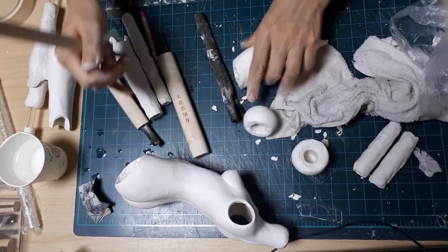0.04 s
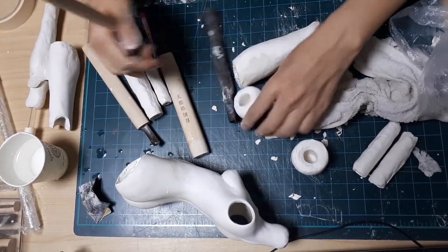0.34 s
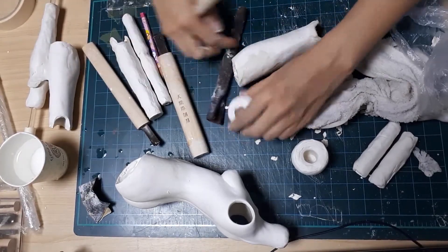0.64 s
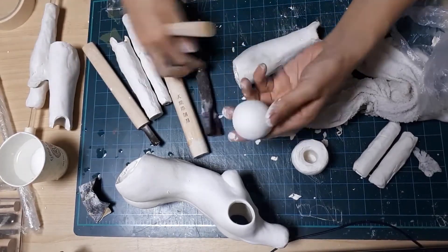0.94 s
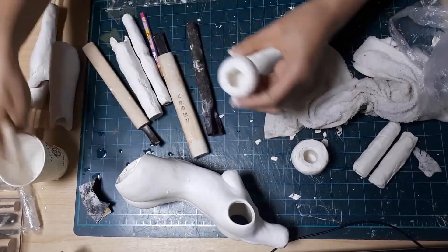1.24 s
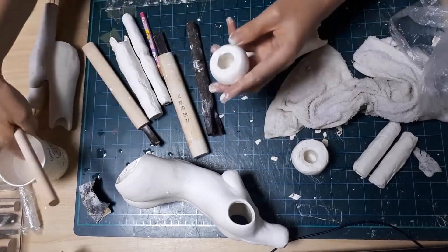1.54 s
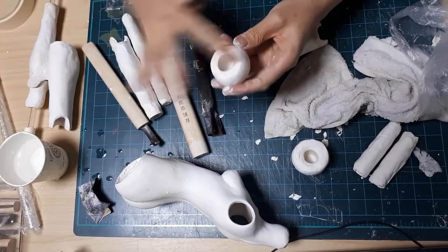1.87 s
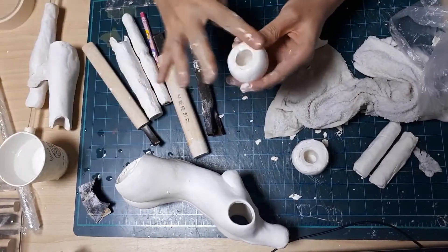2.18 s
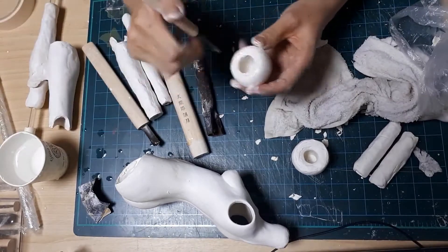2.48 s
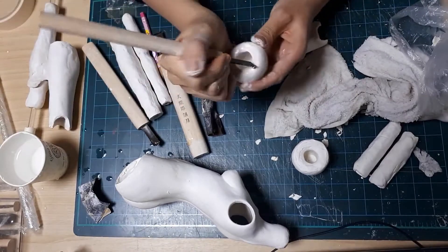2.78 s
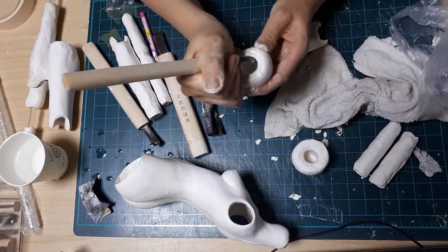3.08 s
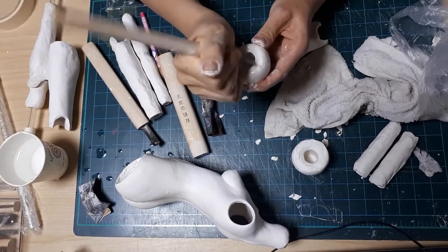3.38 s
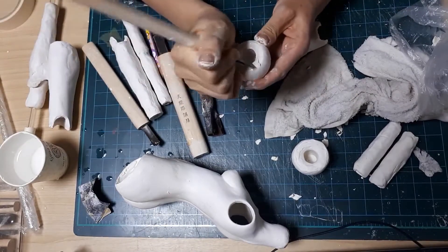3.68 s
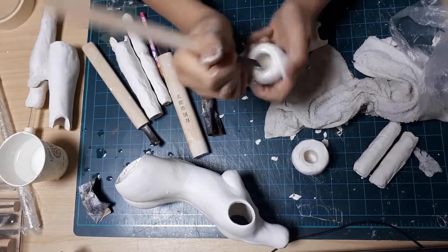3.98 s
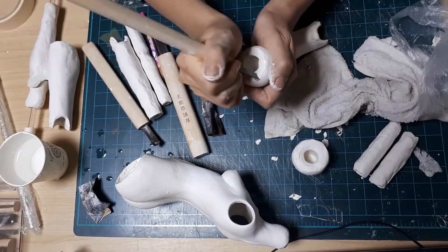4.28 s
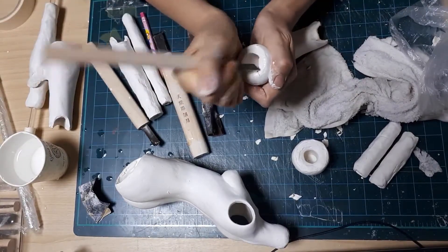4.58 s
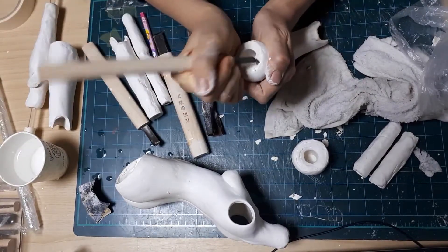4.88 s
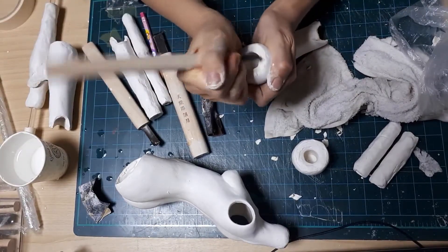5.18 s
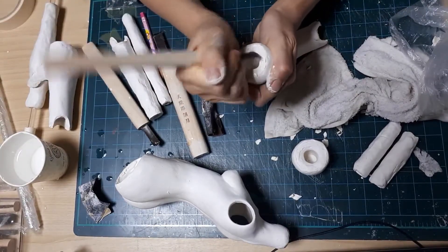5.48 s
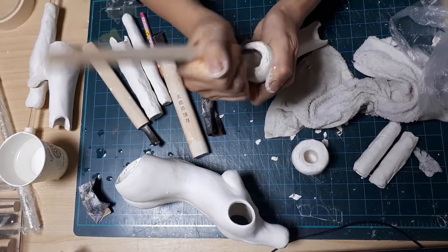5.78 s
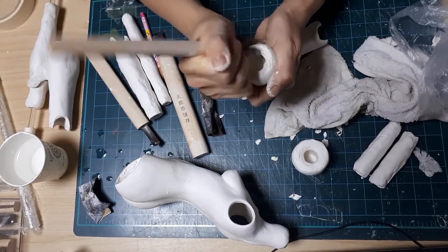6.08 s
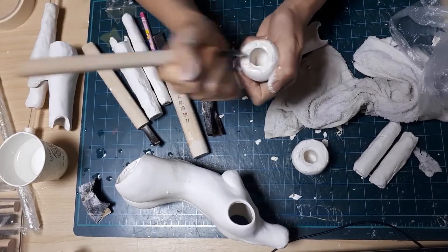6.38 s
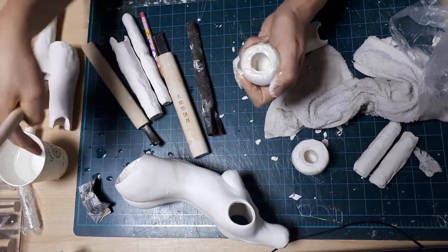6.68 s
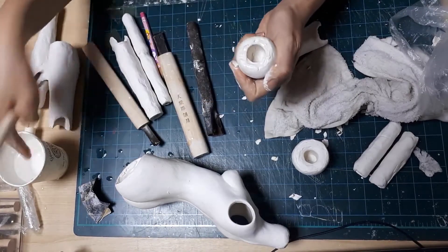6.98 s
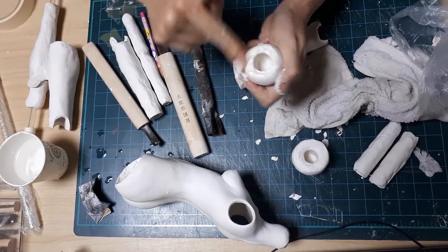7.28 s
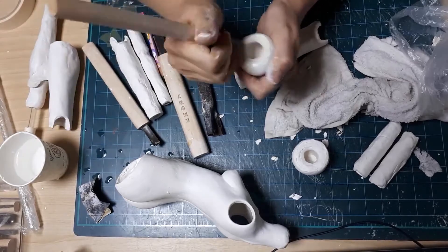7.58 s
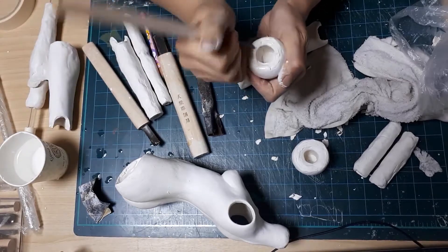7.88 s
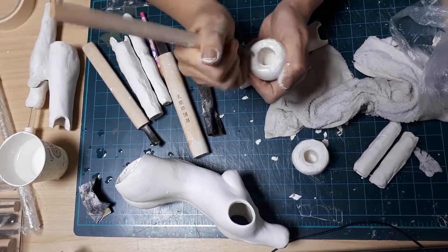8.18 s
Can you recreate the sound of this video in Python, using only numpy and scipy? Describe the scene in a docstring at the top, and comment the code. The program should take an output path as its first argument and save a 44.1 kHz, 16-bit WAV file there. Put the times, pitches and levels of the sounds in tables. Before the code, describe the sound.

Close up at a desk in a small room, a few hollow knocks stand out among light taps, slides and the brief stuttering drag of a clay piece on a mat. After a short lull, a knife scrapes inside the hollow piece in a much quieter series of dry, slightly ringing strokes, squeaking briefly as it catches. The strokes thin out toward the end, over a low, steady fan hum.

```python
"""A fan hums in a small room while things knock on a desk, ringing its modes and bouncing to rest.
Hands shift, tools tap and slide, and a small hollow clay part judders over a cutting mat in stick-slip.
Then a carving knife reams the part's hole in short strokes: the hole resonates with the scraping
and chirps where the blade catches."""
import sys
import numpy as np
from scipy import signal
from scipy.fft import rfft, irfft, next_fast_len
from scipy.io import wavfile
from scipy.ndimage import uniform_filter1d

SR = 44100
rng = np.random.default_rng(int(sys.argv[2]) if len(sys.argv) > 2 else 0)


def store_wav(level_fs):
    """Save 16-bit WAV to argv[1]."""
    pcm = np.round(np.clip(np.atleast_2d(level_fs), -1, 1) * 32767)
    wavfile.write(sys.argv[1], SR, pcm.T.astype(np.int16))


N = 363384


def amp(db):
    """Decibels to gain."""
    return 10 ** (np.asarray(db) / 20)


def unit(x):
    """Scale to rms 1."""
    return x / np.sqrt(np.mean(x ** 2) + 1e-20)


def along(points, hz):
    """Interpolate (freq_hz, value) points on a log axis."""
    freqs, values = np.transpose(points)
    return np.interp(np.log(hz + 1), np.log(freqs + 1), values)


def filtered(x, response):
    """Apply a complex frequency response."""
    n = x.shape[-1]
    size = next_fast_len(n + 8192)
    return irfft(rfft(x, size) * response(np.fft.rfftfreq(size, 1 / SR)), size)[..., :n]


def body(x, spectrum, size=4096):
    """Minimum-phase colour of a struck body."""
    cepstrum = irfft(np.log(amp(along(spectrum, np.fft.rfftfreq(size, 1 / SR)))))
    cepstrum[1:size // 2] *= 2
    cepstrum[size // 2 + 1:] = 0
    return signal.fftconvolve(x, irfft(np.exp(rfft(cepstrum))))[:len(x)]


def resonance(f, hz, width_hz):
    """Causal band-pass, 1 at its centre."""
    return 1j * f * width_hz / (hz * hz - f * f + 1j * f * width_hz)


def add(track, start_s, x):
    """Mix x into the track."""
    start = max(round(start_s * SR), 0)
    part = track[..., start:start + x.shape[-1]]
    part += x[..., :part.shape[-1]]


def stereo(x, right_lead_ms):
    """Arrival-time difference between left and right."""
    return filtered(x, lambda f: np.exp(1j * np.pi * f * right_lead_ms / 1000 * np.array([[-1], [1]])))


def swell(t, length_s, rise_share=0.44):
    """Pressure of one hand movement, peaking at t = 0."""
    side_s = length_s * np.where(t < 0, rise_share, 1 - rise_share)
    return amp(-14 * np.abs(t / side_s) ** 1.21)


def grains(size, rate_per_s=9000):
    """Tiny fractures of uneven size at random moments."""
    breaks = rng.random(size) < rate_per_s / SR
    return breaks * rng.standard_normal(size) * amp(2 * rng.standard_normal(size))


# left-right likeness of the room field: freq_hz, coherence
COHERENCE = [(60, 0.65), (130, 0.69), (290, 0.42), (640, 0.44), (1400, 0), (15000, 0)]


def diffuse(pair):
    """Two unrelated signals become a room field: alike in the bass, unrelated in the treble."""
    angle = lambda f: np.arccos(along(COHERENCE, f)) / 2
    mid, side = filtered(pair, lambda f: np.array([np.cos(angle(f)), np.sin(angle(f))]))
    return np.array([mid + side, mid - side])


# air noise spectrum: freq_hz, level_db
AIR_SPECTRUM = [(15, -60.5), (25, -10), (86, -6), (136, -5), (169, -16), (433, -16.5), (469, -18.5),
                (598, -17), (722, -15), (970, -21), (1380, -25), (1570, -24.5), (2420, -27.5), (5580, -33),
                (15500, -33.5)]
# fan resonances: freq_hz, width_hz, level_db
FAN_RESONANCES = [(155.7, 42, -4), (471.2, 13.8, -4.5), (686, 7.3, -9.5), (755, 11, -19),
                  (1364, 110, -11.5)]
# motor tones: pitch_hz, level_db
MOTOR_TONES = [(134.6, -68.5), (694.4, -78.5), (742.9, -76.5), (1357, -80.5), (1384, -90.5)]


def fan(air_db=-62, hum_db=-68, drift_rad=0.01486):
    """Steady air noise, narrow resonances and slightly unsteady motor tones."""
    t = np.arange(N) / SR
    air = filtered(rng.standard_normal((2, N)), lambda f: amp(along(AIR_SPECTRUM, f)) * f / np.hypot(f, 35))
    hum, tones = np.zeros((2, N)), np.zeros(N)
    for hz, width_hz, db in FAN_RESONANCES:
        noise = rng.standard_normal((2, N))
        hum += amp(db) * filtered(noise, lambda f: resonance(f, hz, 1.5 * width_hz) ** 2)
    for hz, db in MOTOR_TONES:
        drift = np.cumsum(drift_rad * rng.standard_normal(N))
        tones += amp(db) * np.sqrt(2) * np.sin(2 * np.pi * hz * t + drift)
    return amp(air_db) * unit(diffuse(air)) + amp(hum_db) * unit(diffuse(hum)) + tones


# desk modes: freq_hz, level_db, t60_s
DESK_MODES = [(78, 15, 0.48), (112, 19.5, 0.11), (144.8, 21.5, 0.49), (163.1, 22, 0.57), (215.9, 23, 0.38),
              (282.59, 14, 0.31), (340, 16, 0.12), (376, 13, 0.13), (492.8, 14, 0.25), (552, 5.5, 0.15),
              (620, 5, 0.2481), (662, 8.5, 0.19), (710, -8, 0.12), (823, -16, 0.37), (1346, 2, 0.1543),
              (1630, 0, 0.2)]


def desk_top(t, mode_weights, ring_db=-8, build_s=0.0027):
    """Impulse response of the desk; the struck spot weights each mode."""
    hz, db, t60_s = np.transpose(DESK_MODES)[..., None]
    decay = np.log(1000) / t60_s
    modes = amp(db) * 2 * decay / SR * np.exp(-decay * t) * np.cos(2 * np.pi * hz * t)
    wave_spread = 1 - np.exp(-t / build_s)
    return (t == 0) + amp(ring_db) * (mode_weights @ modes) * wave_spread


# mat contact spectrum: freq_hz, level_db
MAT_SPECTRUM = [(100, -65), (500, -19), (950, -10), (1200, -8), (1680, 8.5), (2000, -2), (2420, -2.5),
                (2750, -7), (3500, -14), (4100, -8), (4800, -16), (5800, -14.5), (8000, -18), (10000, -29),
                (15500, -23.5)]


def on_mat(x, tilt_db_per_oct):
    """Colour of a contact with the mat; light contacts are brighter."""
    return filtered(x, lambda f: amp(along(MAT_SPECTRUM, f) + tilt_db_per_oct * np.log2(f / 2000 + 0.047)))


def mat_crush(t, thud_db, click_db=-21, t60_s=0.0038):
    """The soft mat gives way with a thud and a click."""
    crush = rng.standard_normal(len(t)) * amp(-60 * t / t60_s)
    thud, click = on_mat(crush, tilt_db_per_oct=-9.5), on_mat(crush, tilt_db_per_oct=5)
    return amp(thud_db) * thud / np.abs(thud).max() + amp(click_db) * click / np.abs(click).max()


# things set down: start_s, level_db, pitch_hz, contact_q, thud_db, flight_s, bounce_loss_db, right_lead_ms
DESK_KNOCKS = [(0.001, -40, 206, 1.7, -41.5, 0.018, 0, 0), (0.0773, -19.5, 250, 1.2, -8, .0235, 4.5, -0.25),
               (0.5344, -12, 510, 1.7, -35, .0155, 10.5, -0.072), (1.3682, -29, 720, 1.5, 4, .02, 2, 0.088),
               (2.808, -52, 65.6, 3.2, -35, 0.016, 20.5, 0)]


def knocks(rattle_db=-26, rattle_t60_s=0.12, mass_db=-6, bounce_mat_db=-10, flight_ratio=0.88):
    """A short push bends the desk top, which rattles and rings; the thing bounces to rest."""
    out, t = np.zeros((2, N)), np.arange(SR // 2) / SR
    first_ring = desk_top(t, np.ones(len(DESK_MODES)))
    rattle_decay = amp(rattle_db - 60 * t / rattle_t60_s)
    for start_s, db, hz, q, thud_db, flight_s, loss_db, lead_ms in DESK_KNOCKS:
        # the mass keeps pushing after the first touch
        mass = lambda f: amp(mass_db) * resonance(f, 0.4 * hz, 0.14 * hz)
        contact = lambda f: resonance(f, hz, hz / q) / (1 + 1j * f / (1.12 * hz)) + mass(f)
        peak = np.abs(filtered(first_ring, contact)).max()
        for bounce in range(4):
            ring = first_ring
            if bounce:  # lands on another spot
                ring = desk_top(t, np.sign(rng.standard_normal(len(DESK_MODES))))
            rattle = filtered(rattle_decay * rng.standard_normal(len(t)), lambda f: f / (f + 400))
            mat = amp(bounce_mat_db if bounce else 0) * mat_crush(t, thud_db)
            blow = filtered(ring + rattle, contact) / peak + mat
            add(out, start_s, stereo(amp(db - loss_db * bounce) * blow, lead_ms))
            start_s += flight_s * flight_ratio ** bounce
    return out


# hand movements: peak_s, length_s, level_db, pitch_hz
HAND_SHIFTS = [(0.33, 0.049, -47.5, 247), (0.4, 0.066, -49, 185), (0.76, 0.049, -52.5, 236),
               (1.342, 0.065, -59.5, 596), (2.939, 0.43, -67, 437)]


def hand_shifts():
    """Hands rub dully on the desk."""
    out, t = np.zeros(N), np.arange(-SR // 5, SR // 4) / SR
    for peak_s, length_s, db, hz in HAND_SHIFTS:
        rub = filtered(rng.standard_normal(len(t)), lambda f: resonance(f, hz, 1.16 * hz) ** 2)
        add(out, peak_s + t[0], amp(db) * swell(t, length_s) * unit(rub))
    return out


# slides on the mat: peak_s, length_s, level_db, tilt_db_per_oct
MAT_SLIDES = [(0.391, 0.12, -57.5, 5), (0.504, 0.11, -45.5, 2), (0.754, 0.06, -48.5, 3),
              (0.98, 0.078, -47.5, 4), (1.439, .045, -42.5, 8), (1.567, 0.13, -53, 4.5),
              (2.869, 0.11, -55.5, 11.5), (4.048, 0.35, -58.5, 13), (6.929, 0.12, -56, 11)]


def slides():
    """Things slide over the mat with grainy friction."""
    out, t = np.zeros(N), np.arange(-SR // 5, SR // 4) / SR
    for peak_s, length_s, db, tilt in MAT_SLIDES:
        friction = unit(on_mat(grains(len(t)), tilt))
        add(out, peak_s + t[0], amp(db) * swell(t, length_s) * friction)
    return out


# light taps: start_s, level_db, tilt_db_per_oct
MAT_TAPS = [(0.4401, -34, 0.5), (0.579, -28, -0.5), (0.8271, -29.5, 0), (0.868, -31.5, 4), (0.978, -33, 5),
            (0.9868, -29.5, -2), (0.999, -38, 4), (1.335, -33, 9), (1.367, -24.5, -14),
            (6.351, -39.5, 12.5)]


def taps(t60_s=0.0085):
    """The clay part and the tools touch the mat, one noise burst each."""
    out, t = np.zeros(N), np.arange(SR // 20) / SR
    for start_s, db, tilt in MAT_TAPS:
        tap = on_mat(rng.standard_normal(len(t)) * t * amp(-60 * t / t60_s), tilt)
        add(out, start_s, amp(db) * tap / np.abs(tap).max())
    return out


# spectrum of one slip of the clay part: freq_hz, level_db
SLIP_SPECTRUM = [(150, -11), (350, -5.5), (520, -12.5), (850, -10), (1100, -5.5), (1400, -4), (1680, 3.5),
                 (2000, -14.5), (2420, 1), (2750, -11), (5200, -9), (8000, -23), (15500, -22)]


def drag(start_s=0.826, attack_s=0.03, hold_s=0.084, release_s=0.04, level_db=-40.5, hiss_db=-1.5,
         slips_per_s=364, slowing=0.049, jitter_s=0.00008, rasp_gain=0.092, rasp_s=0.0015):
    """The part judders over the hissing mat: one pulse per slip, fastest in mid-pull."""
    out, t = np.zeros(N), np.arange(-SR // 20, SR // 4) / SR
    fade = np.maximum(-t / attack_s, 0) + np.maximum((t - hold_s) / release_s, 0)
    pull = amp(level_db - 20 * fade)
    rate = slips_per_s * (1 - slowing * np.minimum((2 * t / hold_s - 1) ** 2, 2))
    slips = np.flatnonzero(np.diff(np.floor(np.cumsum(rate) / SR)))
    jitter, strength = rng.standard_normal((len(slips), 2)).T
    slips = np.clip(slips + jitter_s * SR * jitter, 0, len(t) - 1).astype(int)
    pulses = np.bincount(slips, amp(1.2 * strength), len(t))
    # each slip crumbles off in a short rasp
    crumble = np.sqrt(signal.lfilter([1], [1, -np.exp(-1 / (rasp_s * SR))], pulses ** 2))
    slipping = pulses + rasp_gain * crumble * rng.standard_normal(len(t))
    hiss = amp(hiss_db) * unit(on_mat(grains(len(t)), tilt_db_per_oct=0))
    add(out, start_s + t[0], pull * (unit(body(slipping, SLIP_SPECTRUM)) + hiss))
    return out


# further resonances of the part and its hole: freq_hz, width_hz, level_db
PART_RESONANCES = [(1340, 230, -6), (2950, 140, -7), (5510, 470, -1.5), (7920, 390, -2.5),
                   (10100, 410, -11.5)]


def clay_part(f, stretch=1):
    """Frequency response of the hollow part to the blade."""
    modes = sum(amp(db) * resonance(f, stretch * hz, width_hz) for hz, width_hz, db in PART_RESONANCES)
    return f / (f + 1500) * modes


# grit spectrum at the edge: freq_hz, level_db
GRIT_SPECTRUM = [(200, -24), (900, -23), (1500, 2.5), (3000, 9), (5000, -0.5), (8000, 5), (9200, -51.5),
                 (12000, -1), (15500, 5)]
# reaming strokes: peak_s, length_s, rise_share, level_db, hole_pitch_hz, ring_db
KNIFE_STROKES = [(3.106, 0.025, 0.74, -45, 1940, -10), (3.281, 0.22, 0.28, -64.5, 1985, 6),
                 (3.454, 0.025, 0.46, -46, 1907, 1), (3.777, 0.036, 0.48, -49.5, 1880, -1),
                 (4.441, 0.035, 0.4, -46.5, 2290, -4), (4.77, 0.096, 0.54, -53.5, 2300, 2),
                 (5.061, 0.096, 0.44, -49, 2214, 5), (5.141, 0.032, 0.39, -56.5, 2090, 9),
                 (5.355, 0.086, 0.32, -48, 2230, 6), (5.643, 0.092, 0.16, -48.5, 2227, 5),
                 (5.962, 0.085, 0.32, -49, 2240, 1.5), (6.333, 0.1, 0.56, -59, 2090, 1.5),
                 (7.926, 0.037, .4, -53.5, 2320, -3), (7.984, .07, .45, -61, 2250, -3),
                 (8.235, 0.089, 0.53, -55.5, 2200, -23)]


def knife_strokes(hole_width_hz=364, glide=0.024, grit_db=-18, rub_db=-10, rub_s=0.092, uneven_db=1.74):
    """The edge breaks off dust, which sounds the hole; it rubs lightly around each bite."""
    out, t = np.zeros(N), np.arange(-SR // 6, SR // 5) / SR
    for peak_s, length_s, rise_share, db, hz, ring_db in KNIFE_STROKES:
        press = np.hypot(swell(t, length_s, rise_share), amp(rub_db) * swell(t, rub_s, rise_share))
        press *= amp(uneven_db * unit(uniform_filter1d(rng.standard_normal(len(t)), size=300)))
        dust = grains(len(t))
        # the blade closes the hole's mouth going in, so the pitch sinks
        depth = np.clip(2 * t / length_s, -1, 1)
        ring = lambda k: filtered(dust, lambda f: resonance(f, hz * (1 - glide * k), hole_width_hz) ** 2)
        hole = sum(np.maximum(1 - np.abs(depth - k), 0) * ring(k) for k in (-1, 0, 1))
        grit = filtered(grains(len(t)), lambda f: amp(along(GRIT_SPECTRUM, f) + grit_db))
        stretch = 1 + 0.018 * rng.standard_normal()  # the blade sits differently each time
        rasp = filtered(dust, lambda f: clay_part(f, stretch))
        add(out, peak_s + t[0], amp(db) * press * unit(amp(ring_db) * hole + rasp + grit))
    return out


# blade catches: peak_s, level_db, half_length_s
BLADE_CATCHES = [(3.112, -36, 0.0027), (3.276, -47.5, 0.0089), (3.317, -50, .005), (3.341, -46, 0.0037),
                 (3.462, -41.5, 0.0027), (3.669, -50.5, 0.0012), (3.785, -43.5, 0.0026),
                 (4.772, -49.5, .003), (4.84, -55, .004), (5.075, -44.5, .003), (5.359, -55, 0.0033),
                 (5.398, -44, .0035), (5.664, -38, 0.0019), (5.694, -44, 0.0035), (5.714, -45, 0.0032),
                 (5.9895, -32.5, 0.0011)]


def blade_catches(flat_share=0.045, sag_per_s=0.57, bend_per_s=4, wander_rad=0.06, chatter_db=-13):
    """A catch rings the hole hard: a chirp near its pitch, lower the later in the stroke."""
    out, t = np.zeros(N), np.arange(-SR // 60, SR // 60) / SR
    for peak_s, db, half_length_s in BLADE_CATCHES:
        stroke_s, *_, hole_hz, _ = min(KNIFE_STROKES, key=lambda stroke: abs(stroke[0] - peak_s))
        hz = hole_hz * (1 - flat_share - sag_per_s * (peak_s - stroke_s))
        wander = np.cumsum(wander_rad * rng.standard_normal(len(t)))
        chirp = np.sin(2 * np.pi * hz * t * (1 - bend_per_s * t / 2) + wander)
        chatter = filtered(rng.standard_normal(len(t)), lambda f: clay_part(f) / (1 + (f / 3200) ** 2))
        envelope = amp(db) * np.exp(-(t / half_length_s) ** 2)
        add(out, peak_s + t[0], envelope * (chirp + amp(chatter_db) * unit(chatter)))
    return out


# room decay: freq_hz, t60_s
REVERB_T60 = [(150, 0.45), (600, 0.3548), (2000, 0.2635), (6000, 0.38), (14000, 0.63)]
# room colour: freq_hz, level_db
REVERB_SPECTRUM = [(100, -2.5), (500, 8), (2000, 1.5), (6000, -2.5), (14000, -5.5)]


def room(x, early_db=3, early_t60_s=0.029, onset_s=0.00026):
    """Desk and near walls answer at once, then the room dies away."""
    hz, t, noise = signal.stft(rng.standard_normal((2, SR // 2)), SR, nperseg=256)
    decay = amp(-60 * t / along(REVERB_T60, hz)[:, None]) + amp(early_db - 60 * t / early_t60_s)
    band_energy = np.sum(decay ** 2, axis=1, keepdims=True) * t[1] * SR
    decay *= amp(along(REVERB_SPECTRUM, hz))[:, None] / np.sqrt(band_energy)
    tail = diffuse(signal.istft(noise * decay, SR, nperseg=256)[1])
    tail *= 1 - np.exp(-np.arange(tail.shape[1]) / (onset_s * SR))
    return signal.fftconvolve(np.atleast_2d(x), tail, axes=1)[:, :N]


def scene():
    """Desk work and fan in the room."""
    desk = knocks()
    hands = taps() + slides() + hand_shifts() + drag()
    blade = knife_strokes() + blade_catches()
    radiated = filtered(desk, lambda f: f / np.hypot(f, 450))  # the board radiates little bass
    thumps = (desk + amp(2) * room(radiated)) * amp([[-0.6], [0.5]])
    handling = stereo(hands, right_lead_ms=-0.027) + room(hands)
    carving = stereo(blade, right_lead_ms=-0.028) + amp(-1) * room(blade)
    return thumps + amp(-1) * (handling + carving) + fan() * amp([[-0.6], [0.6]])


def record(dry, low_cut_hz=22, top_hz=15850):
    """Low cut and hard band limit."""
    return filtered(dry, lambda f: (1j * f / (1j * f + low_cut_hz)) ** 2 * (f < top_hz))


dry = scene()
out = record(dry)
store_wav(out)
```